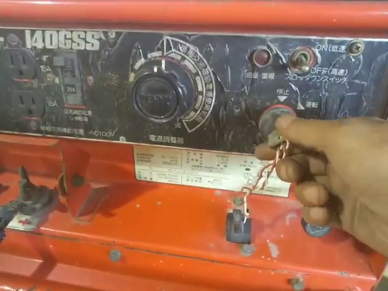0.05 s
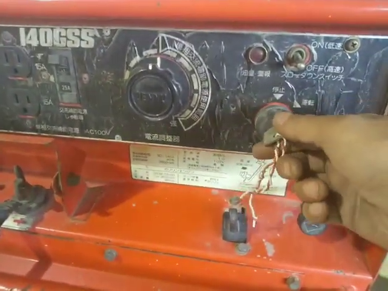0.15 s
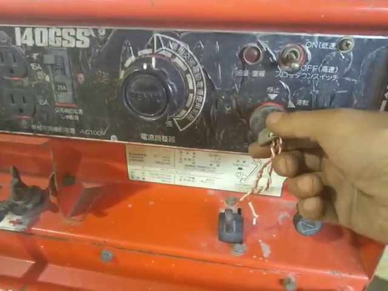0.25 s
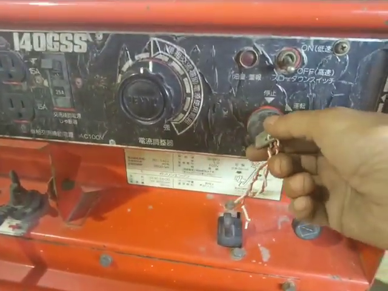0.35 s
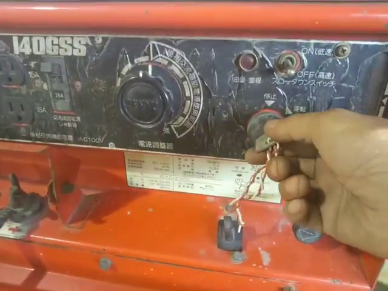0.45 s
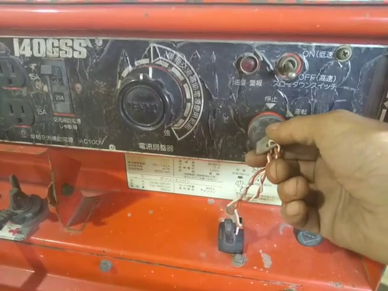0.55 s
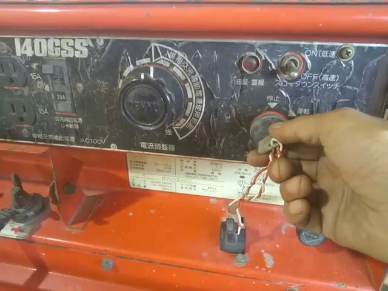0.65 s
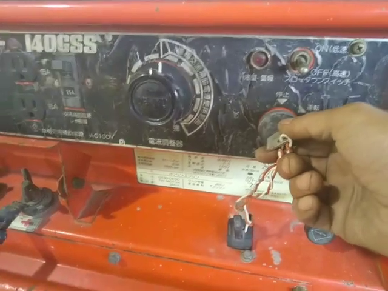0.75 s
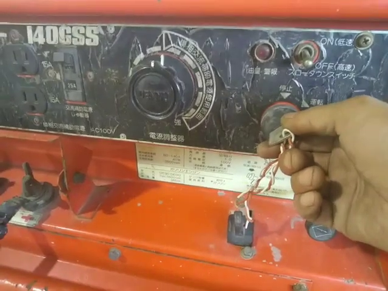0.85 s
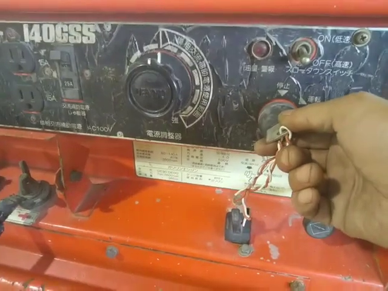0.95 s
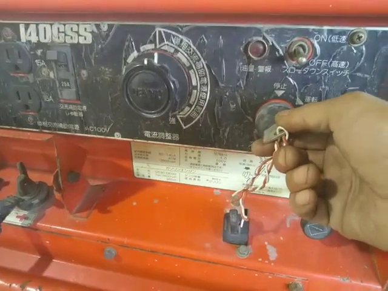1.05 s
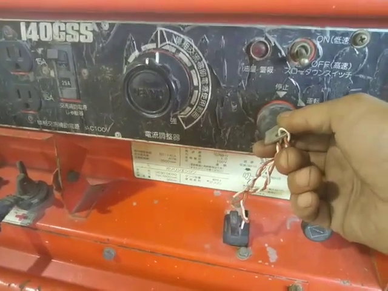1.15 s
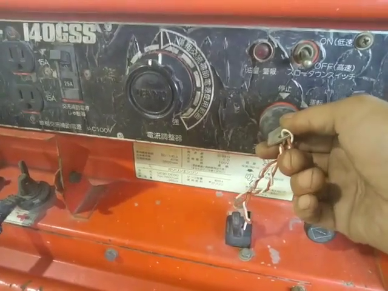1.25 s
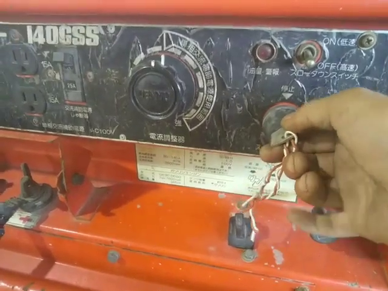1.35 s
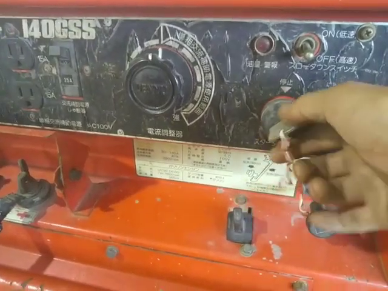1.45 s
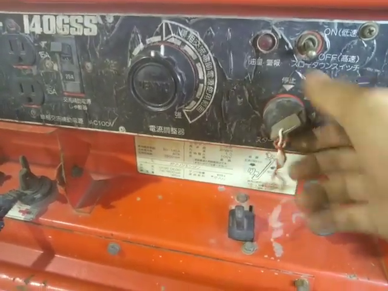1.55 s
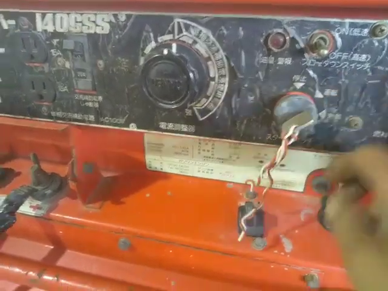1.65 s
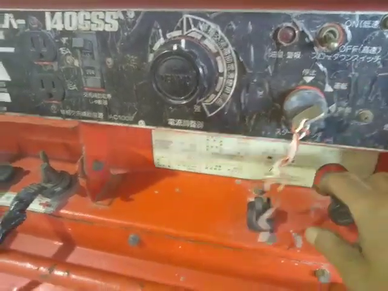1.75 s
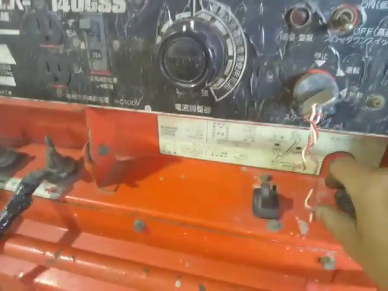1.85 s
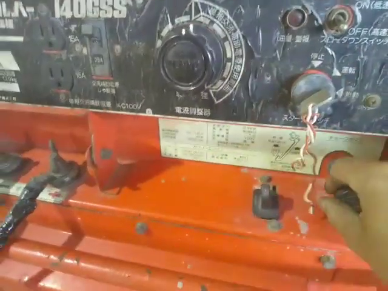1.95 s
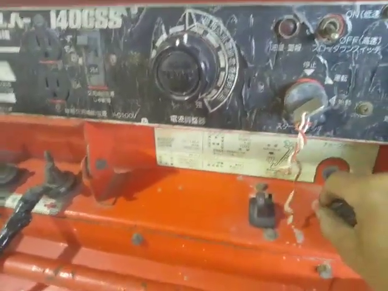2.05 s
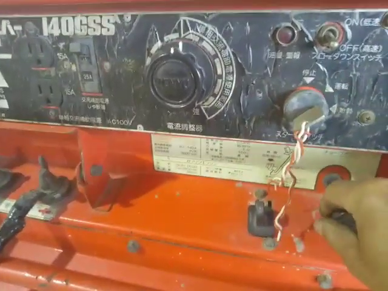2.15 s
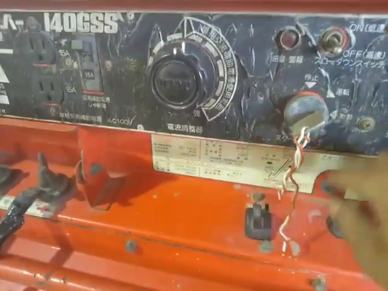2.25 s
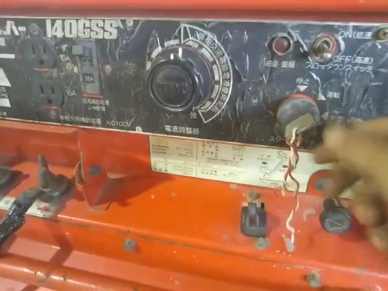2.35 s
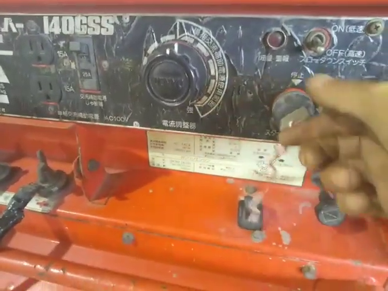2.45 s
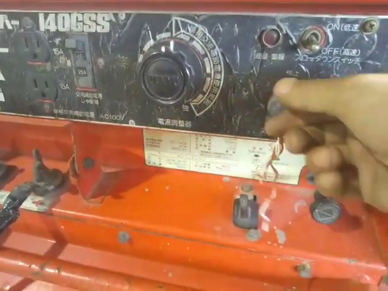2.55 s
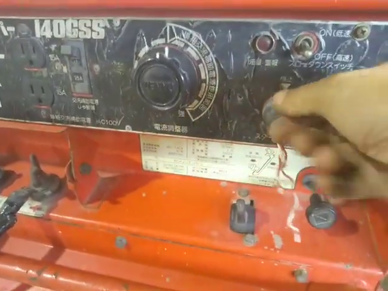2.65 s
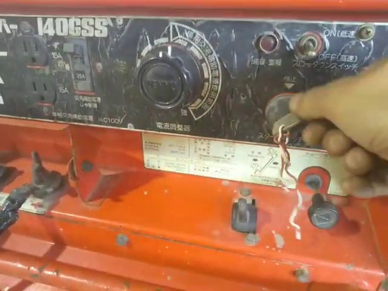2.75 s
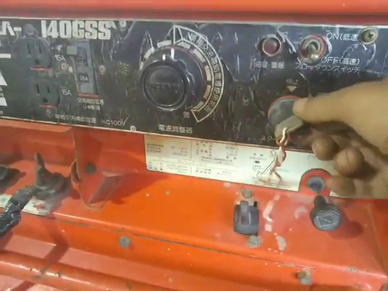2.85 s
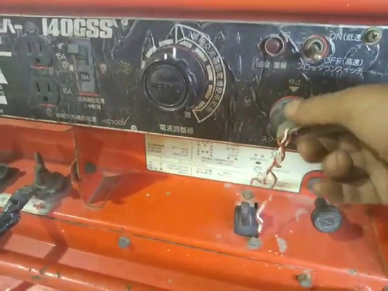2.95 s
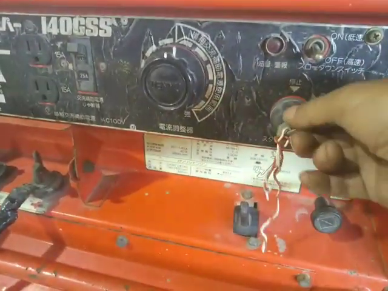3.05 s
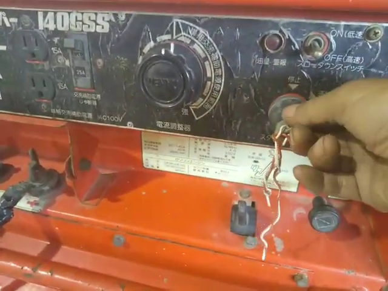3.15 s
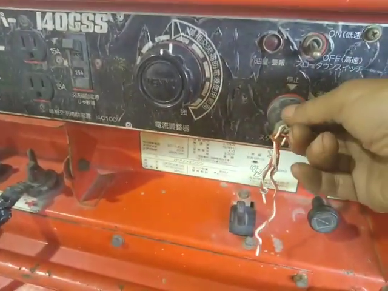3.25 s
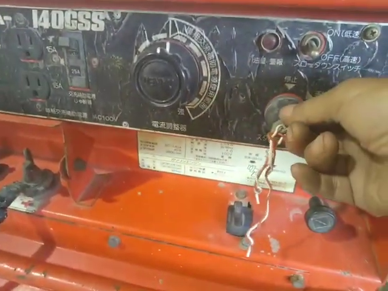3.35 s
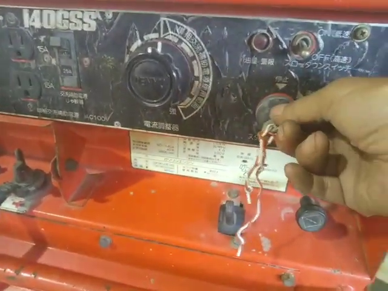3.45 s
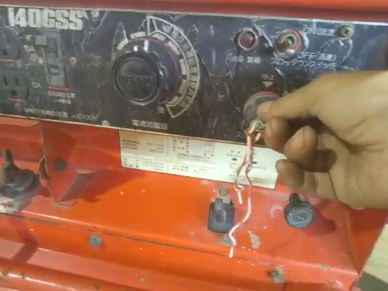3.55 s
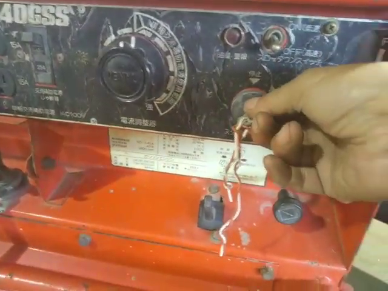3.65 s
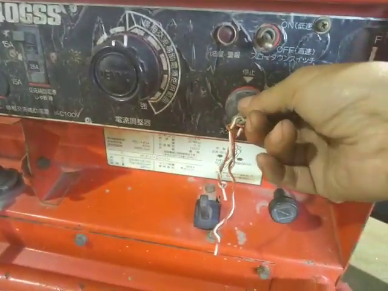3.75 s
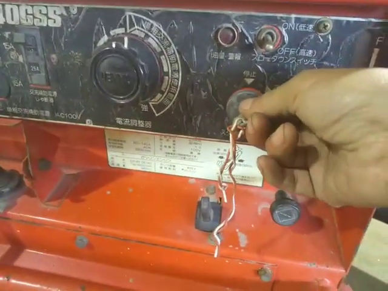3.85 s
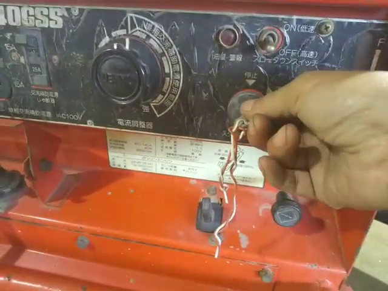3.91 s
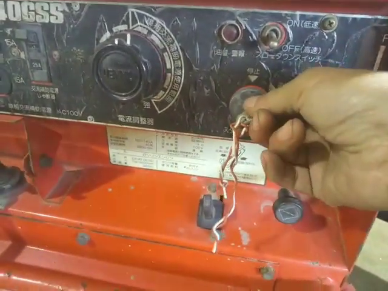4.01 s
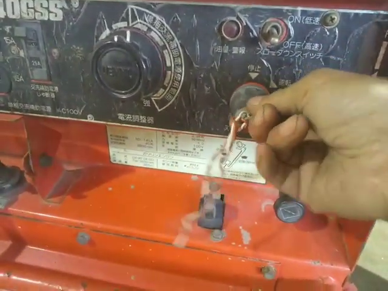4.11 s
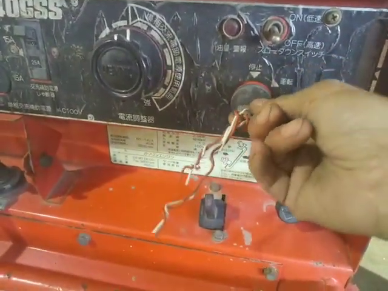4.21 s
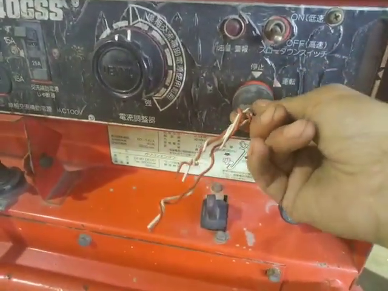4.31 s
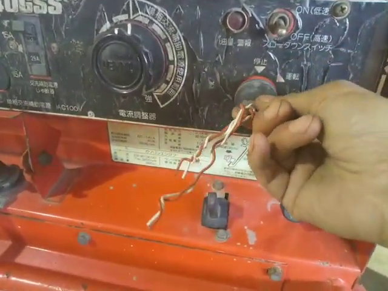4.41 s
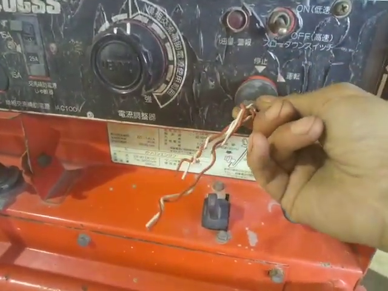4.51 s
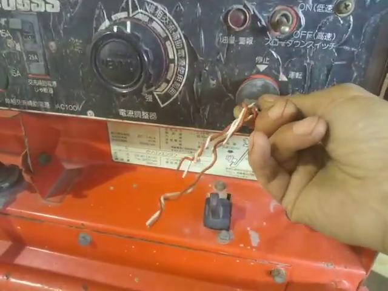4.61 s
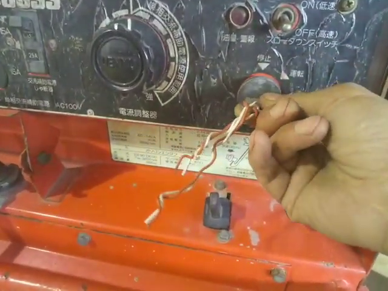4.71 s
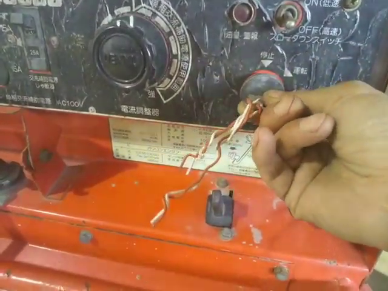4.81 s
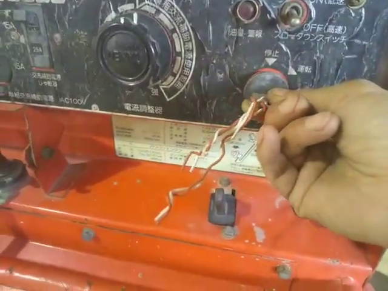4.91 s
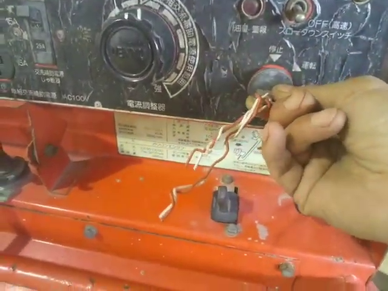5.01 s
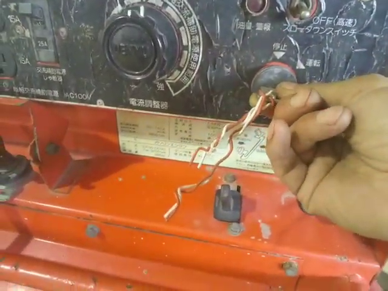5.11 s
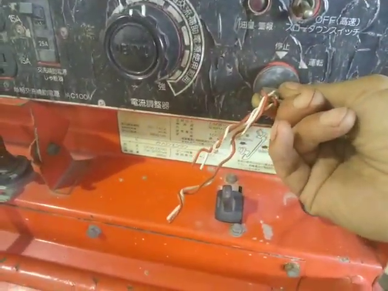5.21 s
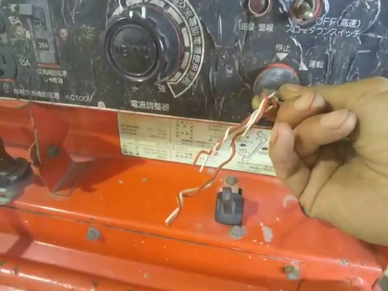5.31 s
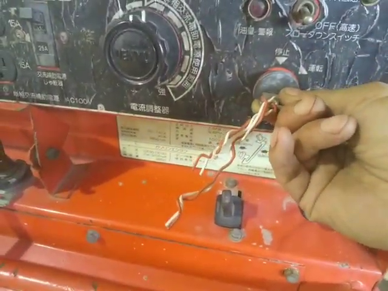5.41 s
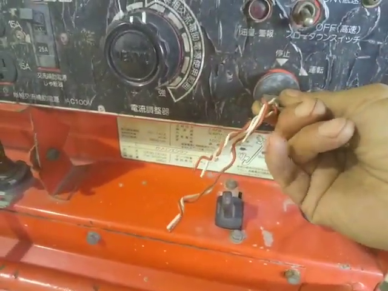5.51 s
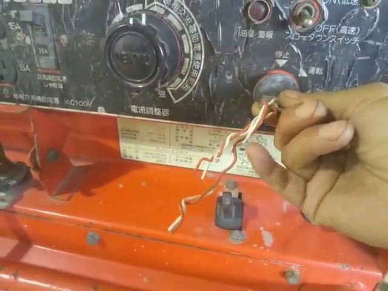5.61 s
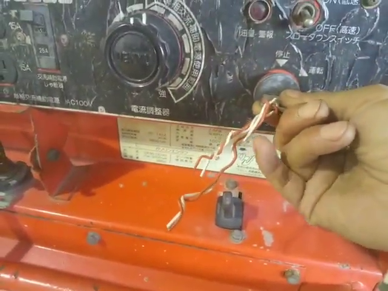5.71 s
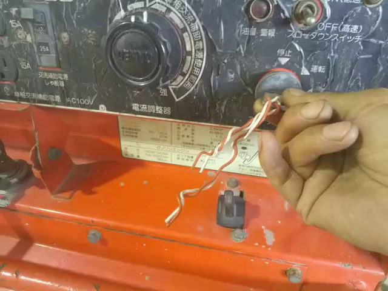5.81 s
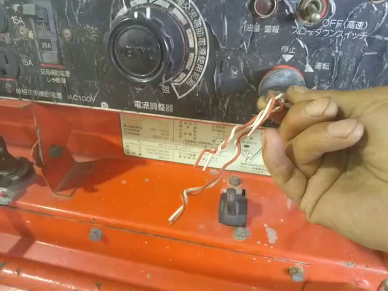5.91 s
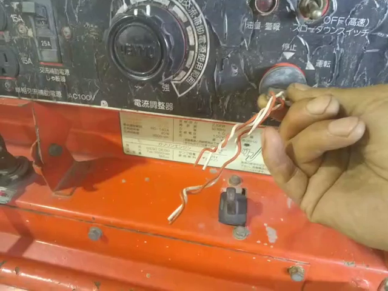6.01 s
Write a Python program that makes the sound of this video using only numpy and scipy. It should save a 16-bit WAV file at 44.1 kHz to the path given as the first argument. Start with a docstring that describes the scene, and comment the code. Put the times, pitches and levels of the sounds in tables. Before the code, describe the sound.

A close microphone at the panel of a diesel welder generator. For the first four seconds it is quiet: a low, wavering hum from far machines, steady dull air noise, and faint hiss and roar swelling briefly around 1 second and again from about 1.9 to 3.9. At 1.57 a key clicks in its lock, tiny, dry and bright, with a weaker tick just after. At 4.27 the starter pinion slams into its gear with a hard metallic crash and low jolt. A gritty whine labours, sags, then climbs, under compression knocks. At about 4.67 the engine fires and the whine fades by 4.9. Strong and weak strokes alternate at first, then even out to roughly eleven or twelve knocks a second. Gear clatter, valve rattle and jingling loose parts ring the steel housing over booming exhaust thuds, with brief high ringing near 5.3. It runs loudly to the end, at about 6 seconds.

```python
"""Close to the control panel of a diesel welder generator, started with its key.
Far machines hum as sine tones and hiss as shaped noise; the key clicks as short noise bursts.
The starter slams in, then whines up as a stack of gear tones with a moving pitch.
The engine fires: knocks and gear clatter, made of tiny impacts, ring the steel housing.
Under them the exhaust thuds as low booming noise; brief sine tones add high ringing notes."""
import sys
import numpy as np
from scipy import signal
from scipy.fft import rfft, irfft
from scipy.io import wavfile
from scipy.ndimage import uniform_filter1d

SR = 44100
rng = np.random.default_rng(int(sys.argv[2]) if len(sys.argv) > 2 else 0)


def to_wav(s):
    """Save 16-bit WAV."""
    ch = np.atleast_2d(s).T  # columns
    pcm = np.round(np.clip(ch, -1, 1) * 32767)  # PCM
    wavfile.write(sys.argv[1], SR, pcm.astype(np.int16))


N = 267687
TIME, BINS = np.arange(N) / SR, np.fft.rfftfreq(N, 1 / SR)  # seconds, Hz

# cylinder knocks while the starter turns the engine, and one more during run-up:
# start_s [s], level_db [dB]
STARTING_KNOCKS = [(4.28, -18.5), (4.358, -21), (4.378, -17.5), (5.06, -20)]
ENGAGE_S = 4.272  # the starter meshes


def engine(housing, knocks):
    """Cylinder knocks and a running clatter of gears and valves ring the steel housing."""
    # loose parts jingling: start_s [s], level_db [dB]
    jingles = [(4.748, -26.5), (4.98, -34), (5.51, -32), (5.565, -27), (5.765, -31), (6.035, -32)]
    shudder = blows([(ENGAGE_S, -14.5)], rise_s=0.011, decay_s=0.078)  # as the starter engages
    gears = np.hypot(running(full_db=-20, slow_db=-3), shudder)
    valves = running(full_db=-25, slow_db=-11.5)

    # dull gears, brighter valves, and the finest treble for loose parts
    dull = 1 / np.sqrt(1 + (BINS / 2500) ** 6)
    fine = 1 / np.sqrt(1 + (8200 / (BINS + 1)) ** 24)
    bright = np.sqrt((1 - dull ** 2) * (1 - fine ** 2))
    gear_hits = gears * amp(0.23 * drift(hz=35)) * impacts(per_s=4000, spread_db=-2.5)
    clatter = ring(gear_hits, housing * dull)
    valve_hits = valves * amp(1.36 * drift(hz=39.4)) * impacts(per_s=16000, spread_db=1.4)
    rattle = ring(valve_hits, housing * bright)

    # small loose parts chatter in uneven bursts and stay faint until the engine is up to speed
    uneven = running(full_db=-35, slow_db=-15.5) * amp(1.7 * drift(hz=5.4))
    shaking = np.hypot(uneven, blows(jingles, rise_s=0.0032, decay_s=0.016))
    chatter = ring(shaking * impacts(per_s=16000, spread_db=-1.0), housing * fine)

    knock_level = blows(STARTING_KNOCKS + knocks, rise_s=0.017, decay_s=0.023)
    knock_hits = knock_level * impacts(per_s=11000, spread_db=0.0)
    knock_tone = colour([(250, -9), (1000, 1.5), (2500, 0), (5000, -1.5), (10000, -1.5)])
    knock = ring(knock_hits, housing * knock_tone)
    return clatter + knock + patchy(rattle + chatter, depth_db=2)


def firings():
    """Lists knocks and thuds: the beat quickens, at first with only every second stroke firing hard."""
    catch_s, beat_s = 4.672, .0868  # first firing, settled time between strokes
    lag_s, settle_strokes = 0.051, 3.3  # total delay from the slow first strokes, how fast they settle
    stroke = np.arange(int((N / SR - catch_s - lag_s) / beat_s) + 1)
    age = stroke * beat_s + lag_s * (1 - np.exp(-stroke / settle_strokes))
    weak = stroke % 2  # 1 on every second stroke
    cold = np.exp(-age / .6)  # fades as the engine warms
    joining = np.exp(-age / 0.2)  # fades as the weak strokes join the exhaust
    scatter_db = .8 * rng.standard_normal((len(stroke), 2))
    # while cold the strong strokes knock harder and the weak ones far less; warm, the two differ little
    knock_db = -18 + 3 * cold + weak * (0.5 - 21 * cold) + scatter_db[:, 0]
    thud_db = -14 - 19 * weak * joining + scatter_db[:, 1]
    start_s = catch_s + age
    thud_lead_s = .005
    return list(zip(start_s, knock_db)), list(zip(start_s - thud_lead_s, thud_db))


def running(full_db, slow_db):
    """Level of a part that starts with the starter and grows from full_db + slow_db up to full_db."""
    spin_up = ramp(4.29, 0.57)
    return ramp(ENGAGE_S, .015) * amp(full_db + slow_db * (1 - spin_up))


def steel_housing():
    """Gain of the steel housing: a broad colour, sharp panel resonances and little deep bass."""
    # broad colour of the steel: pitch_hz [Hz], level_db [dB per Hz]
    steel = [(230, 1.5), (480, -5), (900, -6.5), (1400, -4.5), (2200, -7), (2900, -15.5), (4300, -17),
             (5500, -18.5), (5900, -22.5), (7800, -25), (8400, -22), (9300, -18), (9900, -24),
             (14000, -33.5)]
    # panel resonances: pitch_hz [Hz], width_hz [Hz], level_db [dB above the broad colour]
    panels = [(291, 26, 5), (357, 60, 7), (416, 24, 6), (537, 60, 6), (600, 33, 11), (665, 43, 9),
              (689, 23, 7), (749, 60, 9), (831, 25, 9), (893, 50, 10), (953, 60, 12), (1060, 60, 14),
              (1154, 60, 9), (1225, 31, 9), (1265, 60, 10), (1311, 35, 10), (1620, 60, 7), (1652, 15, 9),
              (1983, 60, 5), (2132, 60, 3), (3175, 32, 11), (3451, 42, 14), (3730, 35, 6), (3914, 60, 10),
              (3965, 21, 9), (4122, 60, 5), (4351, 60, 6), (5553, 60, 4), (8529, 34, 11), (11390, 37, 7)]
    bass_cut = np.sqrt(1 + (190 / (BINS + 1)) ** 8)
    return colour(steel) * np.sqrt(1 + mode_power(panels)) / bass_cut


def exhaust(thuds):
    """Each thud swells a set of low booming tones; a rumble follows the running engine."""
    # low booming tones of the exhaust: pitch_hz [Hz], width_hz [Hz], level_db [dB, relative]
    boom_tones = [(46, 9, -12), (60, 11, -9), (86, 20, -4), (117, 22, 0), (160, 15, -3), (208, 12, -5),
                  (300, 140, -27)]
    # heavy thuds while the engine gathers speed: start_s [s], level_db [dB]
    heavy_thuds = [(4.848, -17), (5.305, -13.5)]
    boom = signal.hilbert(ring(noise(), np.sqrt(mode_power(boom_tones))))
    # every puff carries much the same push, whatever its waveform
    boom_power = uniform_filter1d(abs(boom) ** 2, size=1400) / 2
    even = boom.real / np.sqrt(boom_power)
    puffs = blows(heavy_thuds + thuds, rise_s=0.018, decay_s=.038)
    return even * np.hypot(puffs, running(full_db=-22.5, slow_db=-12))


def starter(housing):
    """The pinion crashes into mesh and jolts the frame; the gear whine sags, then climbs."""
    # pinion hitting the ring gear: start_s [s], level_db [dB]
    pinion = [(4.265, -25), (4.277, -10), (4.294, -15)]
    # whine over time: start_s [s], mesh_hz [Hz], level_db [dB, before the final 7 dB cut]; at first the tone
    # holds steady near a panel resonance of the housing
    motor = [(4.3, 585.7, -33), (4.425, 589.7, -29.5), (4.455, 520.3, -27.5), (4.56, 636, -26),
             (4.62, 697, -26.5), (4.71, 663, -29), (4.85, 608, -36)]
    # partials of the gears: multiple [times the mesh rate], level_db [dB, relative]
    mesh = [(.5, -5), (1, 1.5), (1.5, -2), (2, -7.5), (3, -5), (3.5, -2.5), (4, -2), (5, -1), (6, -18)]
    hits = blows(pinion, rise_s=0.007, decay_s=0.0071) * impacts(per_s=5700, spread_db=2.5)
    crash = ring(hits, housing * colour([(200, 4.9), (2000, 9.2), (12000, 10.6)]))
    jolt_turns = np.cumsum(131 + 16 * drift(hz=29.2)) / SR
    jolt = amp(-5) * blows(pinion, rise_s=0.0041, decay_s=0.08) * np.sin(2 * np.pi * jolt_turns)

    mesh_hz, motor_db = curves(motor)
    load = amp(-5) * blows(STARTING_KNOCKS, rise_s=0.016, decay_s=0.014)  # louder under each compression
    cranking = held(ENGAGE_S, .59, rise_s=0.017, fall_s=.015)
    effort = cranking * np.hypot(amp(motor_db), load)
    # under strain alternate teeth bite harder, which brings out the half orders
    strained_db, freed_db = 2, -23  # change of the half orders: at first, once the engine turns freely
    half_order_db = strained_db + (freed_db - strained_db) * ramp(4.41, 0.22)
    turns = np.cumsum(mesh_hz * (1 + 0.04 * drift(hz=161.6))) / SR
    whine = np.zeros(N)
    for multiple, partial_db in mesh:
        is_half_order = multiple % 1 > 0
        level = amp(partial_db + half_order_db * is_half_order)
        whine += level * (1 + 0.53 * drift(hz=90.5)) * np.sin(2 * np.pi * multiple * turns)
    return crash + jolt + ring(amp(-7) * effort * whine, housing)


def ringing_notes():
    """Brief high notes, slightly rough; the lower ones are starter whine catching housing resonances."""
    # ringing notes: start_s [s], pitch_hz [Hz], length_s [s], level_db [dB]
    notes = [(4.427, 3470, 0.16, -27), (4.553, 3460, 0.12, -26), (4.733, 3180, 0.078, -33),
             (5.313, 8600, 0.082, -28.5), (5.316, 11300, 0.078, -38), (5.547, 8950, 0.026, -31)]
    out, wobble = np.zeros(N), drift(hz=156)
    for start_s, pitch_hz, length_s, level_db in notes:
        swell = np.sin(np.pi * np.clip((TIME - start_s) / length_s, 0, 1)) ** 2
        turns = np.cumsum(pitch_hz + 45 * wobble) / SR
        out += amp(level_db) * swell * np.sqrt(2) * np.sin(2 * np.pi * turns)
    return out * (1 + 0.13 * drift(hz=120))


def key():
    """The lock snaps over in short noise bursts, and the panel briefly carries the sound on."""
    # key clicks: start_s [s], level_db [dB]
    clicks = [(1.5695, -30), (1.572, -38), (1.607, -43)]
    # broad colour of the lock: pitch_hz [Hz], level_db [dB per Hz, relative]
    lock = [(1000, -36), (1900, 4), (2350, 0), (3000, -6), (4800, -3), (7500, -19), (9500, -16),
            (14000, -21)]
    # resonances of the lock barrel: pitch_hz [Hz], width_hz [Hz], level_db [dB above the broad colour]
    barrel = [(2465, 130, 15.5), (3750, 130, 3), (4780, 120, 8.5)]
    snap = blows(clicks, rise_s=.0004, decay_s=0.0022)
    tail = amp(-18) * blows(clicks, rise_s=.003, decay_s=.018)
    return ring((snap + tail) * noise(), colour(lock) * np.sqrt(1 + mode_power(barrel)))


def yard():
    """Wavering hum of far machines, steady air noise, and a roar and uneven hiss that come and go."""
    # humming machines: pitch_hz [Hz], level_db [dB, before the final 2 dB cut]
    hum_tones = [(41.5, -47), (56, -51), (62.4, -41), (78, -40), (82.2, -44.5), (125.6, -42.5), (157, -47),
                 (164.5, -58.5), (186, -54.5), (250.5, -60.5), (997, -69), (1079, -69), (3731, -69.5)]
    # colours of the steady air, the roar and the hiss: pitch_hz [Hz], level_db [dB per Hz, relative]
    air_colour = [(22, -44), (40, -12), (75, -3), (130, -1), (170, -4), (230, -16), (400, -16), (520, -21),
                  (1300, -21), (2200, -29.5), (3600, -37), (5500, -49), (8000, -56), (14000, -74)]
    roar_colour = [(200, -16.5), (450, -5.5), (800, -1.5), (1100, -1), (1700, -6.5), (2500, -13),
                   (5000, -23), (14000, -73)]
    hiss_colour = [(500, -6), (1500, 4), (2200, -3), (2700, 5), (3200, 3), (3750, 3.5), (4400, -2),
                   (6800, -4.5), (7900, -11.5), (8600, -3.5), (10000, -6), (11500, -7.5), (14000, -13.5)]
    hum = np.zeros(N)
    for pitch_hz, level_db in hum_tones:
        turns = np.cumsum(pitch_hz + 0.56 * drift(hz=3.0)) / SR + rng.random()
        waver = 1 + 0.42 * drift(hz=2.8)
        hum += amp(level_db) * waver * np.sqrt(2) * np.sin(2 * np.pi * turns)
    roar_level, hiss_level = far_work()
    air = amp(-39) * ring(noise(), colour(air_colour))
    roar = ring(roar_level * noise(), colour(roar_colour))
    hiss = ring(hiss_level * patchy(noise(), depth_db=2.0), colour(hiss_colour))
    return amp(-2) * hum + air + roar + hiss


def far_work():
    """Levels of roar and hiss: in each burst the hiss starts at once and the roar builds behind it."""
    # bursts: start_s [s], length_s [s], hiss_db [dB], roar_db [dB once built up]
    bursts = [(-.4, 0.39, -55, -40.5), (0.99, .18, -51, -38.5), (1.885, 2.045, -47, -41.5),
              (4.1, 2, -46.5, -34)]
    # surges of the roar: start_s [s], level_db [dB]
    surges = [(2.55, -44), (3.74, -41)]
    # powers add up; the lull between bursts comes first
    roar = amp(-56.5) ** 2 + blows(surges, rise_s=0.14, decay_s=0.3) ** 2
    hiss = amp(-62.5) ** 2
    for start_s, length_s, hiss_db, roar_db in bursts:
        build = 1 - np.exp(-np.maximum(TIME - start_s, 0) / 0.31)
        roar_shape = build * held(start_s, length_s, rise_s=0.076, fall_s=0.079)
        hiss_shape = held(start_s, length_s, rise_s=0.076, fall_s=0.081)
        roar = roar + (amp(roar_db) * roar_shape) ** 2
        hiss = hiss + (amp(hiss_db) * hiss_shape) ** 2
    return np.sqrt(roar), np.sqrt(hiss) * amp(.6 * drift(hz=1.7))


def amp(db):
    """Decibels to gain."""
    return 10 ** (np.asarray(db) / 20)


def unit(x):
    """Scales to rms 1."""
    return x / np.sqrt(np.mean(x ** 2) + 1e-20)


def colour(points):
    """Gain at every frequency from a short list of (Hz, dB) points."""
    hz, db = np.transpose(points)
    return amp(np.interp(np.log(BINS + 1), np.log(hz), db))


def curves(rows):
    """Each column of a table after the first, as a curve over time."""
    start_s, *columns = np.transpose(rows)
    return [np.interp(TIME, start_s, column) for column in columns]


def mode_power(modes):
    """Summed power response of steep-sided resonances."""
    power = 0
    for pitch_hz, width_hz, level_db in modes:
        detune = 2 * (BINS - pitch_hz) / width_hz
        power = power + amp(level_db) ** 2 / (1 + detune ** 2) ** 2
    return power


def ring(x, gain):
    """Passes x through a body that rings only after it is struck; white noise keeps its level."""
    log_gain = np.log(np.maximum(unit(gain), 1e-5))
    # folding the cepstrum gives the minimum-phase response: as early as this gain allows
    cepstrum = irfft(log_gain, N)[:N // 2]
    cepstrum[1:] *= 2
    response = irfft(np.exp(rfft(cepstrum, N)), N)[:SR // 2]
    return signal.oaconvolve(x, response)[:N]


def noise():
    """White noise of rms 1."""
    return rng.standard_normal(N)


def drift(hz):
    """Random wander of rms 1, mostly slower than hz."""
    return unit(irfft(rfft(noise()) * np.exp(-(BINS / hz) ** 2), N))


def impacts(per_s, spread_db):
    """A hail of tiny impacts of uneven size, rms 1."""
    size = amp(spread_db * np.minimum(rng.exponential(1, N), 4))
    struck = rng.random(N) < per_s / SR
    return unit(noise() * size * struck)


def blows(rows, rise_s, decay_s):
    """Envelope of a series of blows that swell quickly and die away."""
    power = np.zeros(N)
    for start_s, level_db in rows:
        age = np.maximum(TIME - start_s, 0)
        shape = (1 - np.exp(-(age / rise_s) ** 2)) * np.exp(-age / decay_s)
        power += (amp(level_db) * shape / (shape.max() + 1e-9)) ** 2
    return np.sqrt(power)


def ramp(start_s, length_s):
    """Smooth step from 0 to 1."""
    return np.sin(np.pi / 2 * np.clip((TIME - start_s) / length_s, 0, 1)) ** 2


def held(start_s, length_s, rise_s, fall_s):
    """Envelope that rises, holds and dies away."""
    age = np.maximum(TIME - start_s, 0)
    rise = 1 - np.exp(-(age / rise_s) ** 2)
    return rise * np.exp(-np.maximum(age - length_s, 0) / fall_s)


def patchy(x, depth_db):
    """Uneven texture: small patches of time and pitch, about 20 ms by 800 Hz, swell and fade."""
    z = signal.stft(x, nperseg=512, noverlap=384)[2]
    field = uniform_filter1d(rng.standard_normal(z.shape), size=9, axis=0)  # across pitch
    field = uniform_filter1d(field, size=7, axis=1)  # across time
    z = z * amp(depth_db * np.clip(unit(field), -2, 2))
    return signal.istft(z, nperseg=512, noverlap=384)[1][:N]


def diffuse(x):
    """The same sound with its phases scrambled, as it arrives from all around."""
    z = signal.stft(x, nperseg=256)[2]
    scrambled = z * np.exp(2j * np.pi * rng.random(z.shape))
    return np.sqrt(2) * signal.istft(scrambled, nperseg=256)[1][:N]  # makes up for the level lost


def scene():
    """All sources in the middle; only the treble scatters to the sides."""
    # stereo width: pitch_hz [Hz], level_db [dB, side over middle]
    width = [(2800, -77), (3500, -74), (5500, -14.5), (9000, -7.5), (13000, -5)]
    housing = steel_housing()
    knocks, thuds = firings()
    machine = engine(housing, knocks) + exhaust(thuds) + starter(housing) + ringing_notes()
    mid = machine + key() + yard()
    side = irfft(rfft(diffuse(mid)) * colour(width), N)
    return np.array([mid + side, mid - side])


def record(dry):
    """The microphone drops the deepest bass, the loudest peaks are rounded off, then the treble ends."""
    lean = irfft(rfft(dry) / np.sqrt(1 + (33 / (BINS + 1)) ** 10), N)
    rounded = lean / (1 + (lean / .92) ** 6) ** (1 / 6)
    treble_edge = signal.firwin(511, 14300, window=("kaiser", 9), fs=SR)  # cutoff in Hz
    return signal.oaconvolve(rounded, treble_edge[None], "same")


dry = scene()
out = record(dry)
to_wav(out)
```